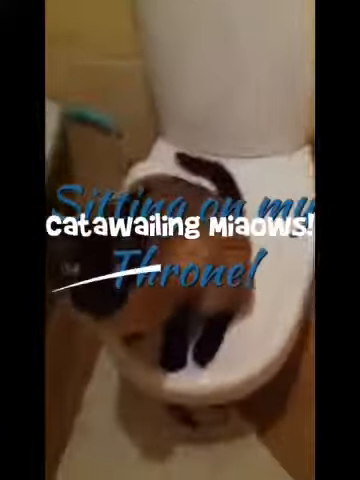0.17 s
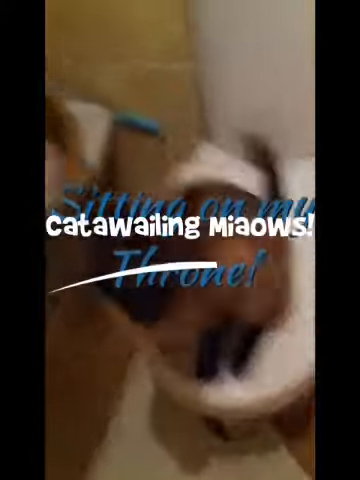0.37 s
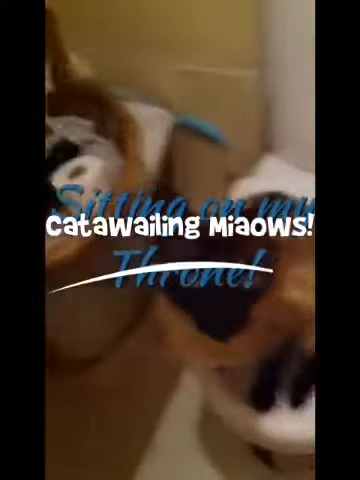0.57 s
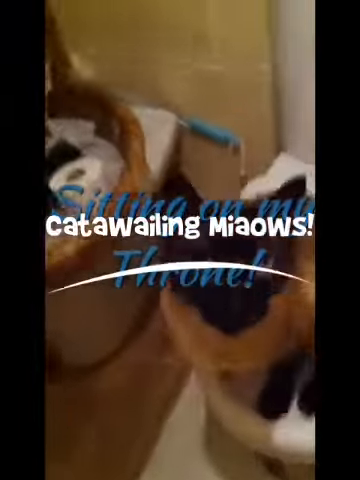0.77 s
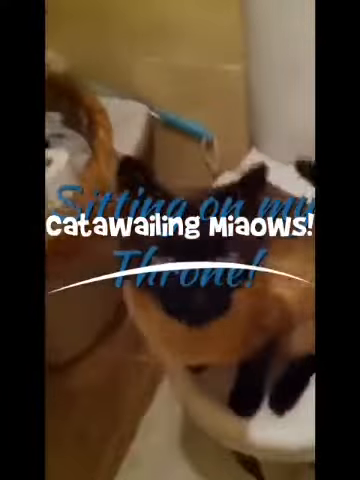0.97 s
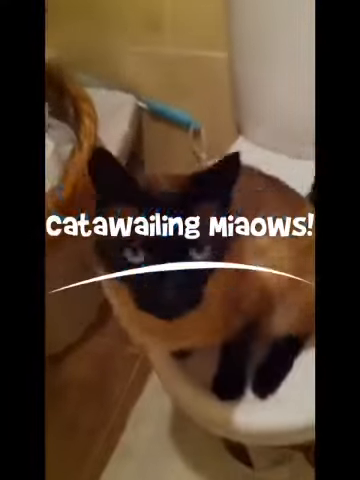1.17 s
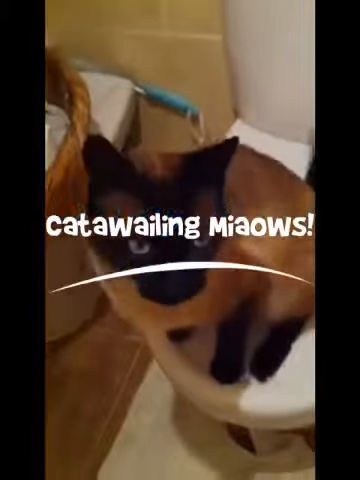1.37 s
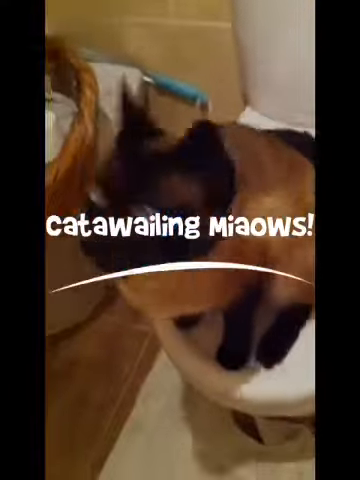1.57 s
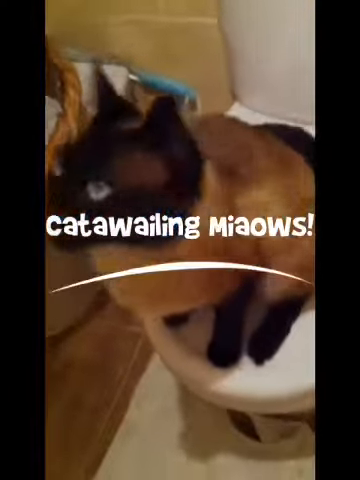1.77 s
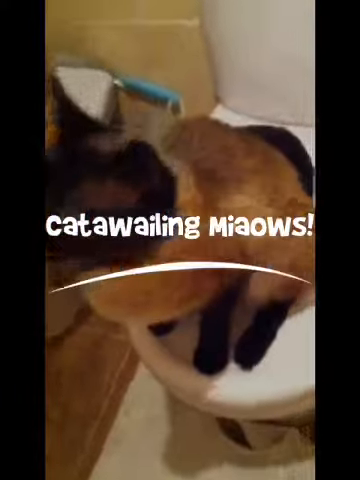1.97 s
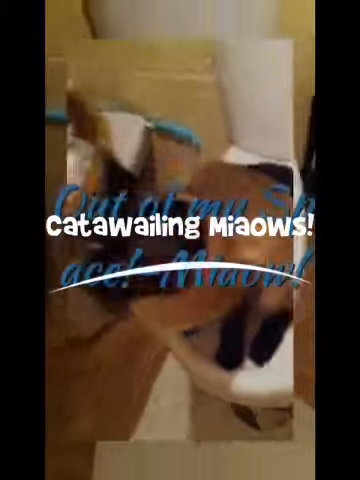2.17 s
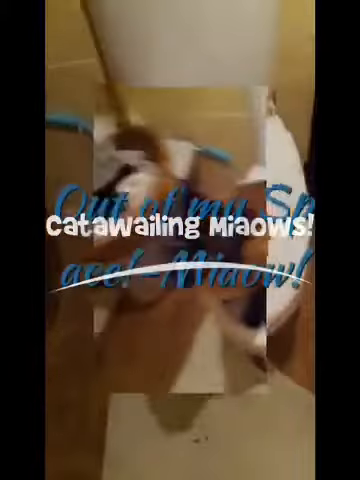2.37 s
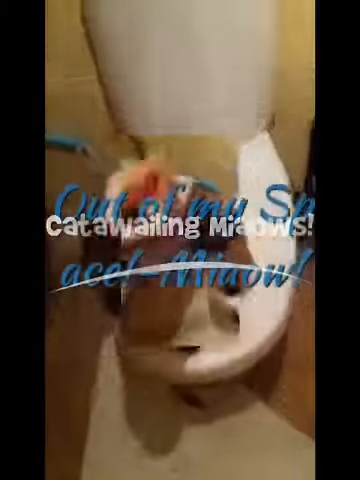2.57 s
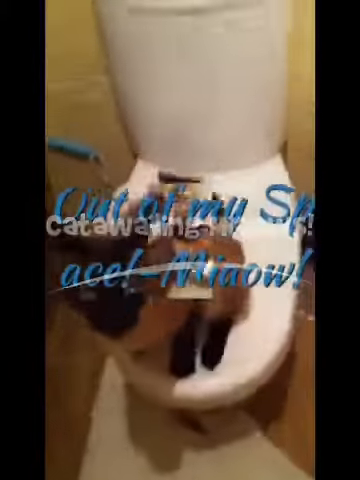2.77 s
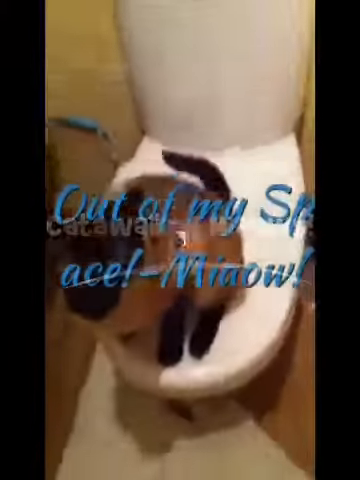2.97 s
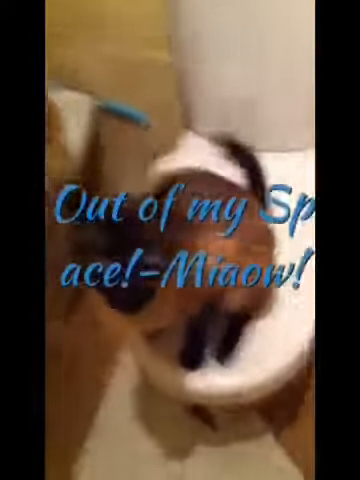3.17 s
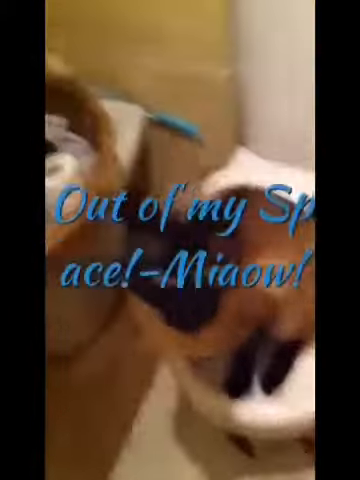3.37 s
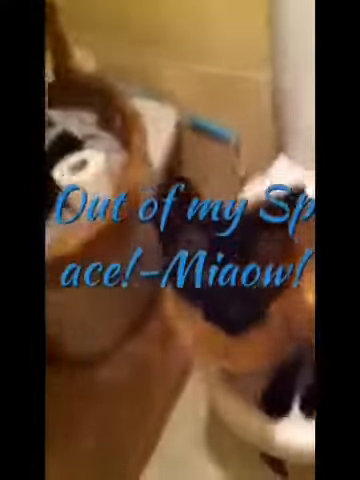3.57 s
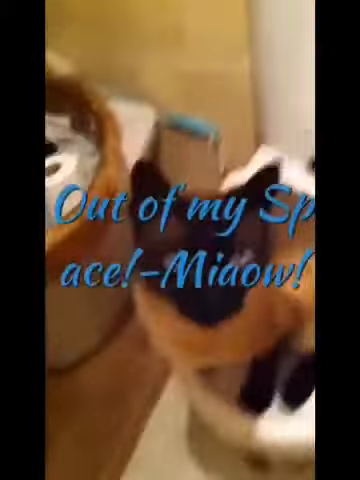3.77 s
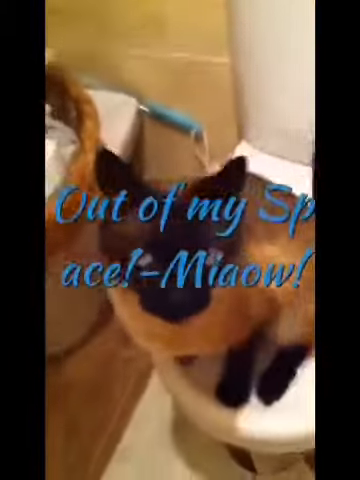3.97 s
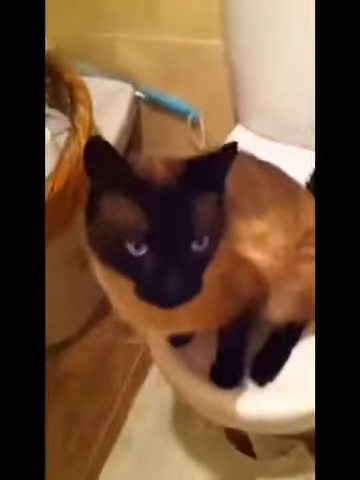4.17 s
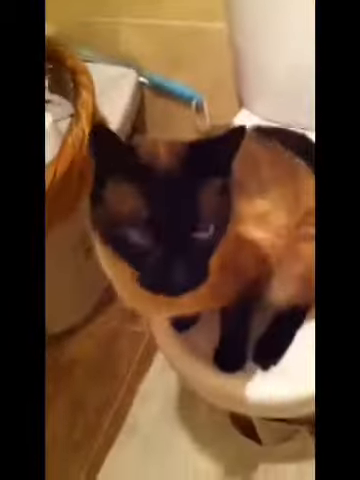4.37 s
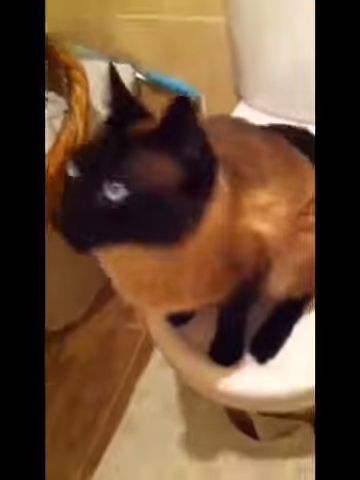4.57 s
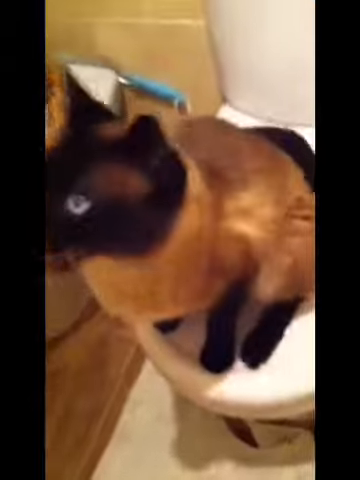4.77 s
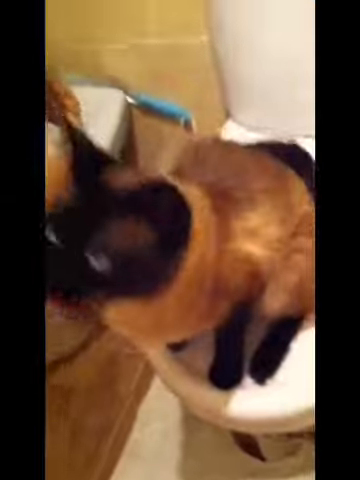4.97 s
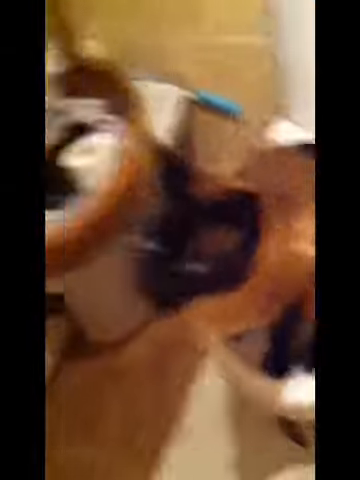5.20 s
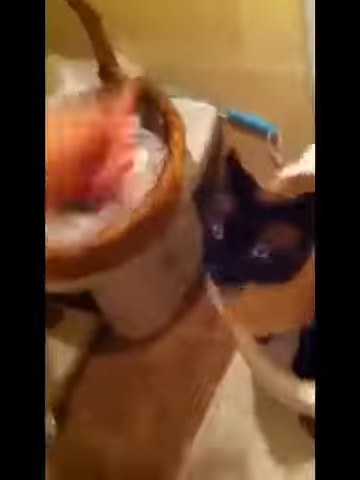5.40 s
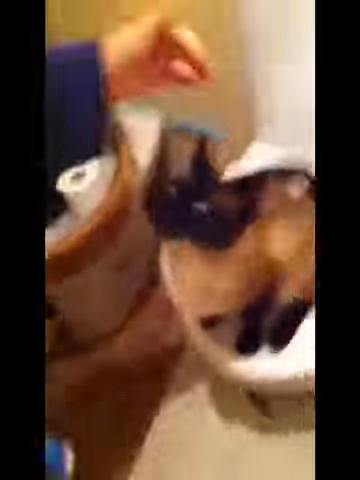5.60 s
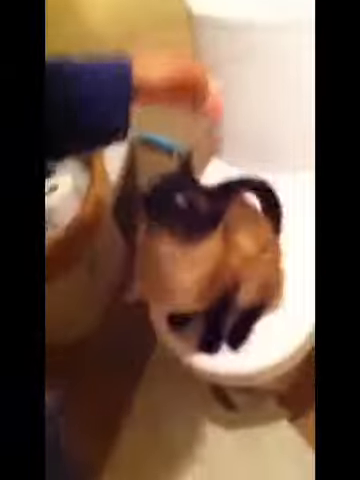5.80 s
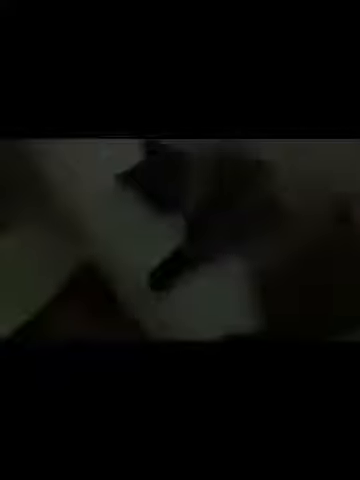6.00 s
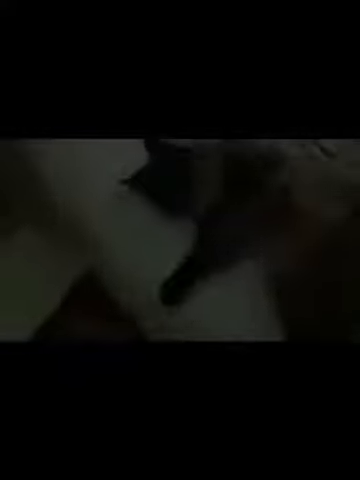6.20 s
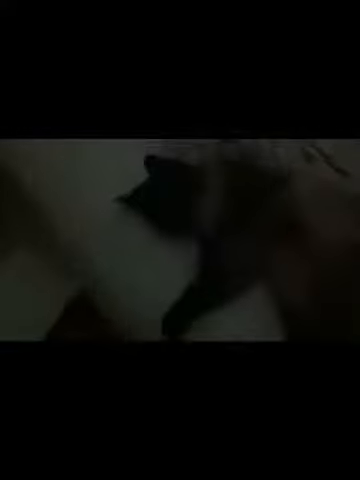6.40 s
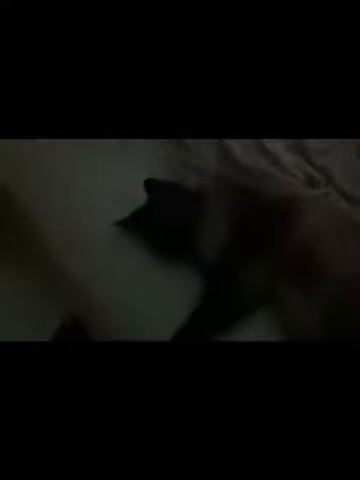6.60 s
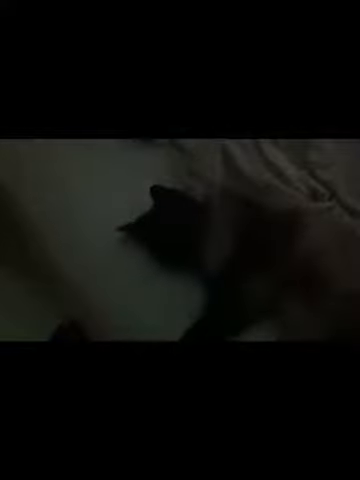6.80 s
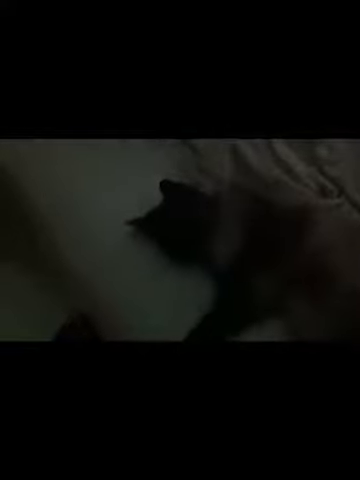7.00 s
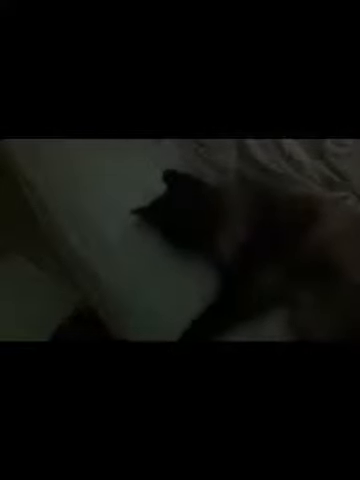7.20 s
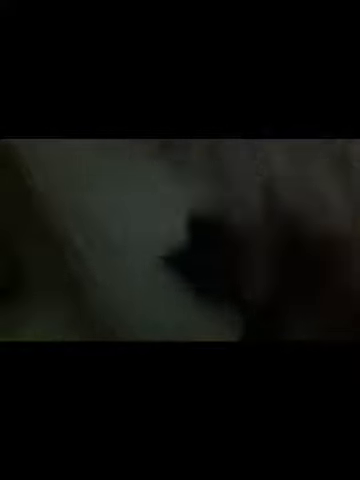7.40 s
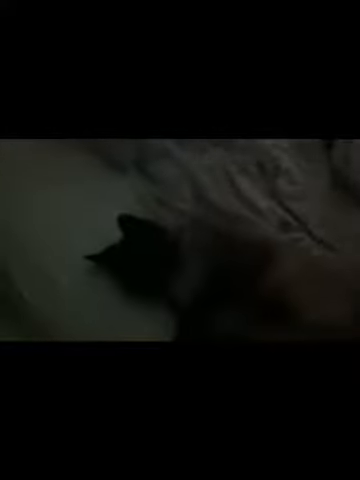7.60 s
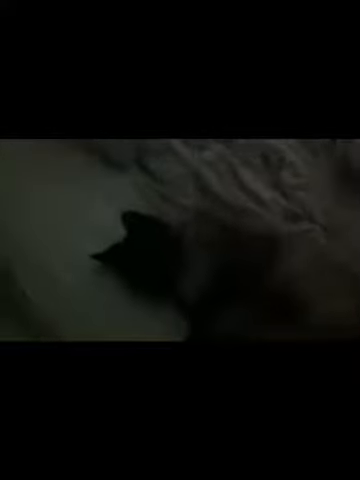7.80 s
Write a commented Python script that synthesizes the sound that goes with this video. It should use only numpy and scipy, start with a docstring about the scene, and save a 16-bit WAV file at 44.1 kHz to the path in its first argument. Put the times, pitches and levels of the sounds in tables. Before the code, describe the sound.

A cat cries in a bright, reverberant little bathroom over faint hiss: dull closing moan, fur rustle, dry snap, breathy rasp, chirp, then a piercing meow sagging in pitch. It all repeats once, a touch softer. Afterwards the sound switches to a dim hush with a low wavering hum, gentle cloth movement, one small knock, little ticks, and an abrupt close click from handling the device.

```python
"""Cat in a bathroom, then a humming bedroom

A cat on a toilet seat in a small tiled room: the falling end of a moan, a rustle and a snap, then a chirp
and a long meow between soft rasps. This bout sounds twice, fading in the second time. A humming bedroom
follows, where bedding rustles, something knocks softly, and fingers scuff and click against a camera.
The voice is a stack of harmonics plus air noise; rustles and snaps are shaped noise; clicks are short rings."""
import sys
import numpy as np
from scipy import signal
from scipy.fft import rfft, irfft, next_fast_len
from scipy.io import wavfile
from scipy.ndimage import map_coordinates

SR = 44100
rng = np.random.default_rng(int(sys.argv[2]) if len(sys.argv) > 2 else 0)


def put_to_file(sound):
    """Save the sound as 16-bit audio at rate SR, in the file named by the first command-line argument."""
    columns = np.atleast_2d(sound).T  # one column per channel
    safe = np.clip(columns, -1, 1)
    whole_steps = np.round(safe * 32767)
    wavfile.write(sys.argv[1], SR, whole_steps.astype(np.int16))


N = 346185  # length of the whole sound [samples]


def amp(db):
    """Turn decibels into a plain multiplier."""
    return 10 ** (np.asarray(db) / 20)


def unit(x):
    """Scale to an average (rms) strength of 1."""
    return x / np.sqrt(np.mean(x ** 2) + 1e-20)


def along(points, hz):
    """Read a (frequency, value) table at any frequency, on a log axis like our hearing."""
    table_hz, values = np.transpose(points)
    return np.interp(np.log(hz + 1), np.log(table_hz), values)


def curves(rows, t):
    """Draw a line through each column after the time, and read it at the times t."""
    times, *columns = np.transpose(rows)
    return [np.interp(t, times, column) for column in columns]


def wobble(rate, size):
    """A smooth random curve with `rate` random points a second."""
    knots = rng.standard_normal(int(size * rate / SR) + 4)
    return map_coordinates(knots, [np.arange(size) * rate / SR])


def noise(spectrum, size, tilt_db=0):
    """Hiss of rms 1 coloured by a spectrum; the tilt [dB per octave] acts above 700 Hz."""
    padded = next_fast_len(size)
    hz = np.fft.rfftfreq(padded, 1 / SR)
    gain = amp(along(spectrum, hz) + tilt_db * np.log2(np.maximum(hz, 700)))
    coloured = irfft(rfft(rng.standard_normal(padded)) * gain, padded)
    return unit(coloured[:size])


def add(track, s, x):
    """Mix x into the track, starting at second s."""
    start = max(round(s * SR), 0)
    track[start:start + len(x)] += x[:max(N - start, 0)]


def bump(x, centre, width):
    """A bell shape with its top at 1."""
    return np.exp(-.5 * ((x - centre) / width) ** 2)


def held(t, attack_s, release_s):
    """Rise, hold and fall, from 0 to 1 and back."""
    return np.clip(np.minimum((t - t[0]) / attack_s, (t[-1] - t) / release_s), 0, 1)


def glide(rows):
    """The times of a call and its pitch at each."""
    t = np.arange(rows[0][0], rows[-1][0], 1 / SR)
    return t, curves(rows, t)[0]


# how long the echo takes to fall by 60 dB between tiled walls: (frequency [Hz], fall time [s])
ECHO_TIMES = [(300, 0.88), (1500, 0.57), (3500, 0.4), (7000, 0.22), (14000, 0.073)]


def room(x, wet_db, early_t60=0.23, late_db=-8):
    """Direct sound, a dense answer of the near walls, and a weaker tail that dies sooner in the treble."""
    hz, t, z = signal.stft(rng.standard_normal(SR * 3 // 4), SR, nperseg=256)
    early = amp(-60 * t / early_t60)
    late = amp(late_db - 60 * t / along(ECHO_TIMES, hz)[:, None])
    bright = hz / (hz + 600)  # tiles throw back more treble than bass
    tail = signal.istft(z * (early + late) * bright[:, None], SR, nperseg=256)[1]
    echo = amp(wet_db) * tail / np.linalg.norm(tail)
    response = np.concatenate([[1], np.zeros(SR // 300), echo])  # the echo waits 1/300 s
    return signal.fftconvolve(x, response / np.linalg.norm(response))


# level of the voice's harmonics by frequency, as heard: (frequency [Hz], level [dB])
VOICE_COLOUR = [(700, 2), (1480, -2), (1650, 0), (2100, -5), (3800, -11.5), (5800, -11.5), (7300, -26),
                (9000, -26), (11000, -37.5), (13000, -30), (15500, -48.5)]


def call(pitch, strong_db, strong_hz, upper_db, jitter, rasp_db, tilt_db):
    """Harmonics of the vocal folds, coloured and lifted in two regions, with air noise gated once a cycle."""
    size = len(pitch)
    slack = (pitch.max() / pitch) ** 9  # the folds grow unsteady as they slacken and the pitch falls
    pitch = pitch * (1 + jitter * slack * (wobble(70, size) + .9 * wobble(400, size)))
    phase = 2 * np.pi * np.cumsum(pitch) / SR
    out = np.zeros(size)
    for k in range(1, 21):
        hz = k * pitch
        strong = strong_db * bump(hz, strong_hz, 486)
        upper = upper_db * bump(hz, 4220, 550)
        shape_db = along(VOICE_COLOUR, hz) + strong + upper
        flicker_db = .7 * wobble(30, size)  # per octave: the higher harmonics are less steady
        out += amp(shape_db + (tilt_db + flicker_db) * np.log2(k)) * np.sin(k * phase)
    air = noise([(70, -26.5), (190, 1), (380, -3), (600, -12), (900, -13.5), (2600, 4.5), (5500, 3.5),
                 (7200, -27.5), (13000, -21), (16000, -27.5)], size)  # (frequency [Hz], level [dB])
    out += amp(rasp_db + .18 * upper_db) * air * (1 + np.cos(phase))  # a tighter throat rasps more
    flutter_db = np.minimum(200 * jitter * slack, 3.2)
    return out * amp(flutter_db * wobble(160, size))  # slack folds also flutter in level


# the long meow holds high, steps down and collapses; the third column is the strongest region of the
# tone, shifted by room echoes too: (time [s], pitch [Hz], strongest region [Hz])
MEOW_PATH = [(2.086, 799.4, 3220), (2.15, 826.8, 3200), (2.2, 821, 2950), (2.265, 815.8, 2820),
             (2.32, 785, 2700), (2.37, 759.4, 2660), (2.46, 746, 2560), (2.53, 744, 3020), (2.6, 738, 2660),
             (2.68, 711.6, 2600), (2.73, 628.5, 2750), (2.775, 580, 2700)]
STRONG_DB = 19.7  # lift of that region
CLIMAX_S, CLIMAX_WIDTH_S, CLIMAX_DB = 2.228, .042, 11.5  # it stands out most here, by this much extra
CLOSE_S, SHUT_TILT_DB = 0.13, -3.5  # the mouth shuts at the end and dulls the voice, per octave
EFFORT_DB, FULL_S, BUILD_DB_PER_S, SAG_DB_PER_S = -33, 2.17, 95, 6  # the voice builds fast and sags slowly
UPPER_FROM_HZ, UPPER_DB_PER_HZ, UPPER_MAX_DB = 791, 0.29, 17.5  # an upper region grows as the pitch falls


def meow():
    """A long voice that rings most near the top pitch, then brighter and raspier until the mouth shuts."""
    t, pitch = glide(MEOW_PATH)
    strong_hz = curves(MEOW_PATH, t)[1]
    opening = held(t, attack_s=.012, release_s=CLOSE_S)
    strong_db = opening * (STRONG_DB + CLIMAX_DB * bump(t, CLIMAX_S, CLIMAX_WIDTH_S))
    upper_db = opening * np.minimum(UPPER_DB_PER_HZ * (UPPER_FROM_HZ - pitch), UPPER_MAX_DB)
    effort_db = EFFORT_DB - np.maximum(BUILD_DB_PER_S * (FULL_S - t), SAG_DB_PER_S * (t - FULL_S))
    voice = call(pitch, strong_db, strong_hz, upper_db, jitter=.0012, rasp_db=-17.3,
                 tilt_db=SHUT_TILT_DB * (1 - opening))
    return room(amp(effort_db) * held(t, attack_s=.005, release_s=.06) * voice, wet_db=-2.7)


# the chirp that leads into the meow dips and rises: (time [s], pitch [Hz])
CHIRP_PATH = [(1.975, 625), (2.0, 595), (2.024, 680), (2.052, 720)]


def chirp():
    """A short soft note with the mouth barely open."""
    t, pitch = glide(CHIRP_PATH)
    voice = call(pitch, strong_db=6, strong_hz=2400, upper_db=-1, jitter=0.0017, rasp_db=-26.0, tilt_db=-3.5)
    return room(amp(-44.5) * held(t, attack_s=.012, release_s=0.017) * voice, wet_db=-3.5)


# the falling end of a softer meow: (time [s], pitch [Hz])
MOAN_PATH = [(0, 637), (.1, 605.3), (.14, 585.5), (.178, 514.5), (.205, 527.3), (.29, 478)]


def moan():
    """A soft meow that dulls and breaks up as the mouth closes."""
    t, pitch = glide(MOAN_PATH)
    closing = t / t[-1]
    voice = call(pitch, strong_db=14.5 - 33.6 * closing, strong_hz=1620 + 400 * closing, upper_db=-8,
                 jitter=.0035, rasp_db=-21, tilt_db=-2.5)
    return room(amp(-50.5 + 4.3 * closing) * held(t, attack_s=0.0019, release_s=0.12) * voice, wet_db=-3.5)


def swell(spectrum, rise, t60, tilt_db):
    """Noise that grows for three rise times, then dies away by 60 dB in t60 seconds."""
    t = np.arange(round((3 * rise + t60) * SR)) / SR - 3 * rise  # the peak is at time 0
    envelope = np.where(t < 0, bump(t, 0, rise), amp(-60 * np.maximum(t, 0) / t60))
    return envelope * noise(spectrum, len(t), tilt_db)


# colour of stirring fur, cloth or breathy rasps: (frequency [Hz], level [dB per Hz])
RUSTLE_COLOUR = [(88, -40), (150, -10.5), (339, -13.5), (550, -13), (1170, -4), (1400, -7), (1510, -2),
                 (1730, -5.5), (3100, -5.5), (5030, -5.5), (15500, -10.5)]


def rustles(rows):
    """Soft swells of noise, made slightly grainy by a fast random level."""
    out = np.zeros(N)
    for s, db, rise, t60, tilt_db in rows:
        add(out, s - 3 * rise, amp(db) * swell(RUSTLE_COLOUR, rise, t60, tilt_db))
    return out * amp(0.78 * wobble(130, N))


# colour of a snap or tick: (frequency [Hz], level [dB per Hz])
SNAP_COLOUR = [(150, -36), (550, -29), (900, 0.5), (1300, -4.5), (2100, -5.5), (2800, -11), (7000, -16.5),
               (8000, -15.5), (15500, -26)]


def snaps(rows):
    """Short bursts of noise, each with its own share of echo from the walls."""
    out = np.zeros(N)
    for s, db, t60, tilt_db, wet_db in rows:
        burst = swell(SNAP_COLOUR, 0.00027, t60, tilt_db)
        add(out, s, amp(db) * room(burst, wet_db))
    return out


# a small knock among the bedding at 6.308 s, then contacts on the camera case:
# (time [s], level [dB], ring [Hz], time to fall 60 dB [s])
KNOCK_AND_CLICKS = [(6.308, -45, 640, 0.065), (7.4381, -7, 4306, 0.0021), (7.4724, -18.5, 1270, .0045),
                    (7.482, -32, 253, .022), (7.482, -25, 6300, .0027), (7.49, -33, 1000, 0.0065),
                    (7.4985, -38, 800, .008)]
# colour of a finger sliding on the case: (frequency [Hz], level [dB per Hz])
SCUFF_COLOUR = [(47, -41), (80, -15), (125, 0), (1260, 0), (2430, -11), (3390, -9), (4610, -18),
                (6710, -22), (8550, -32), (15500, -26)]
OVERTONE_RATIO, OVERTONE_DB = 2.1, -8  # the knock and every click also ring a higher mode


def knock_and_handling():
    """A small dry knock, then heavily damped clicks of the camera case and a finger sliding over it."""
    out, t = np.zeros(N), np.arange(SR // 20) / SR
    for s, db, hz, t60 in KNOCK_AND_CLICKS:
        overtone = amp(OVERTONE_DB) * np.sin(2 * np.pi * OVERTONE_RATIO * hz * t)
        ring = amp(-60 * t / t60) * (np.sin(2 * np.pi * hz * t) + overtone)
        crack = amp(-18 - 60 * t / .007) * rng.standard_normal(len(t))
        add(out, s, amp(db) * (ring + crack))
    add(out, 7.453, amp(-40.5) * swell(SCUFF_COLOUR, rise=.0042, t60=.085, tilt_db=-.3))
    return out


# fur or cloth stirring around the snap:
# (time [s], level [dB], rise [s], time to fall 60 dB [s], tilt [dB per octave])
FUR_RUSTLES = [(.245, -52, .03, 0.24, -2.5), (.546, -42, .015, .45, 0.5), (.8, -51.5, .08, .42, -2.5),
               (.93, -54.5, 0.039, 2.3, -1.5)]
# airy swells around the long meow:
# (time [s], level [dB], rise [s], time to fall 60 dB [s], tilt [dB per octave])
AIRY_RASPS = [(1.92, -48.5, 0.039, 1, -3), (2.078, -49, .003, .17, -5), (2.775, -46, .025, .55, -2.5),
              (3.02, -48.5, 0.017, 0.41, -3)]
# the snap: (time [s], level [dB], time to fall 60 dB [s], tilt [dB per octave], echo against direct [dB])
BATHROOM_SNAPS = [(.640, -26.5, 0.047, -.8, 3.5)]
# colour of the bathroom's hush: (frequency [Hz], level [dB per Hz])
BATHROOM_COLOUR = [(18, -76.5), (30, -59), (161, -4), (251, -6), (286, -2.5), (566, -7.5), (662, -8.5),
                   (838, -9), (1150, -13.5), (2270, -14.5), (3450, -14.5), (3830, -15.5), (7580, -15.5),
                   (15800, -19.5)]
# the bout and its repeat: (delay of moan, rustle and snap [s], delay of chirp, meow and rasps [s], end [s])
BOUT_TIMES = [(0, 0, 3.09), (2.871, 2.8503, 5.94)]
BATHROOM_DB = -61  # the hush, before the repeat's own level
FADE_FROM_S, FADE_S, REPEAT_DB = 2.22, 2.8, -2.3  # the repeat grows evenly from silence to this level


def bathroom():
    """Moan, rustle, snap, chirp and meow over a hush; the repeat fades in under the first bout."""
    t = np.arange(N) / SR
    lead_in = rustles(FUR_RUSTLES) + snaps(BATHROOM_SNAPS)
    add(lead_in, MOAN_PATH[0][0], moan())
    cry = rustles(AIRY_RASPS)
    add(cry, CHIRP_PATH[0][0], chirp())
    add(cry, MEOW_PATH[0][0], meow())
    bouts = []
    for lead_in_delay, cry_delay, end in BOUT_TIMES:
        bout = amp(BATHROOM_DB) * noise(BATHROOM_COLOUR, N)
        add(bout, lead_in_delay, lead_in)
        add(bout, cry_delay, cry)
        bouts.append(bout * (t < end))
    first, repeat = bouts
    fade_in = np.clip((t - FADE_FROM_S) / FADE_S, 0, 1)
    return first + amp(REPEAT_DB) * repeat * fade_in


# bedding stirring: (time [s], level [dB], rise [s], time to fall 60 dB [s], tilt [dB per octave])
BEDDING_RUSTLES = [(6.31, -52.5, 0.027, .26, -4.5), (6.44, -54, .025, .5, -2), (6.57, -55, .06, 0.27, 3),
                   (6.935, -59.5, 0.03, 0.22, 5.5)]
# small ticks: (time [s], level [dB], time to fall 60 dB [s], tilt [dB per octave], echo against direct [dB])
BEDROOM_TICKS = [(6.703, -40.5, .038, 1, 0), (6.803, -42, 0.0093, 0.52, -8), (7.387, -40, 0.009, 4.5, -7),
                 (7.598, -32, 0.01, 3, -2.5)]
# colour of the bedroom's hush: (frequency [Hz], level [dB per Hz])
BEDROOM_COLOUR = [(18, -72), (30, -42), (42, -38), (90, -14), (149, -10.5), (193, -2), (226, -5), (362, -5),
                  (471, -2.5), (716, -7.5), (860, -6.5), (1310, -11), (2270, -10), (4150, -18.5),
                  (15800, -26)]
BEDROOM_FROM_S, BEDROOM_DB = 5.93, -56  # start and level of the hush


def bedroom():
    """A steady hush with a low wavering hum, stirring bedding and small ticks."""
    t = np.arange(N) / SR
    hum_level = amp(-12.0 + 2.5 * wobble(5, N))  # against the hush
    hum = hum_level * np.sin(2 * np.pi * 197 * t + .5 * wobble(6, N))
    hush = amp(BEDROOM_DB) * (noise(BEDROOM_COLOUR, N) + hum)
    return hush * (t > BEDROOM_FROM_S) + rustles(BEDDING_RUSTLES) + snaps(BEDROOM_TICKS)


def scene():
    """Add up both rooms, the knock and the handling, as one channel."""
    return (bathroom() + bedroom() + knock_and_handling())[None]


TOP_HZ = 15850  # nothing is kept from here up


def record(dry):
    """The small microphone loses the deep bass; the camera keeps nothing above its band limit."""
    thin = signal.sosfilt(signal.butter(2, 95, "highpass", fs=SR, output="sos"), dry)
    m = next_fast_len(N + SR // 2)
    kept = np.fft.rfftfreq(m, 1 / SR) < TOP_HZ
    return irfft(rfft(thin, m) * kept, m)[..., :N]


dry = scene()
out = record(dry)
put_to_file(out)
```